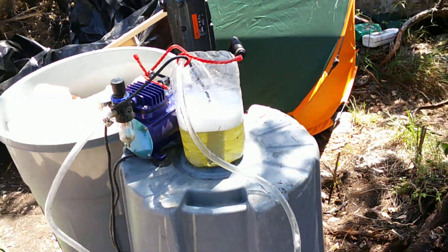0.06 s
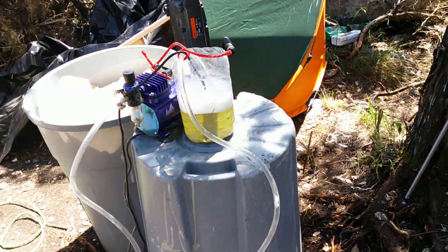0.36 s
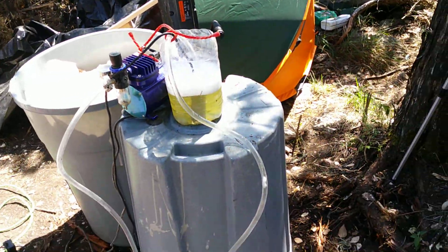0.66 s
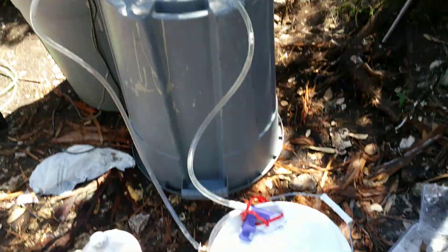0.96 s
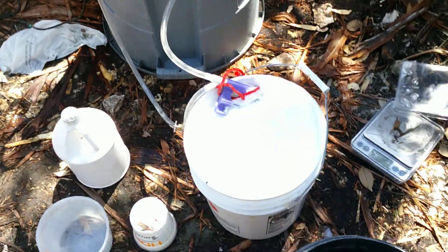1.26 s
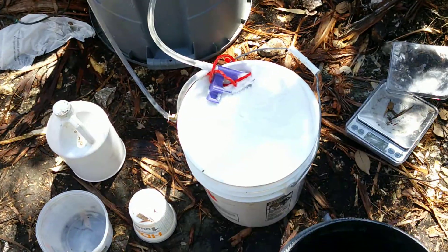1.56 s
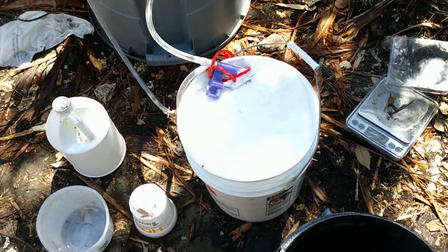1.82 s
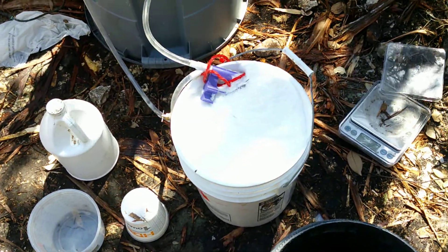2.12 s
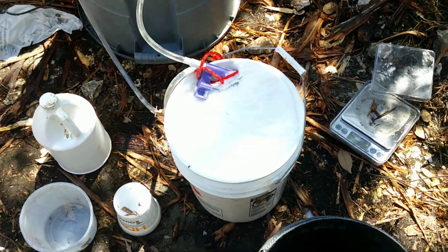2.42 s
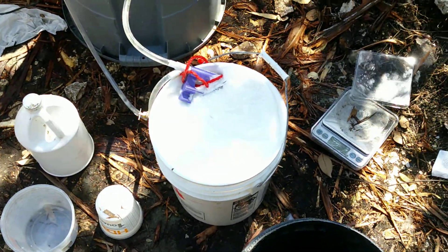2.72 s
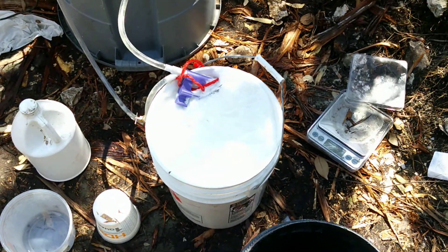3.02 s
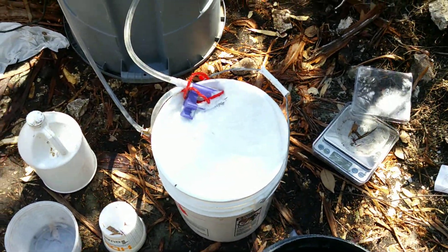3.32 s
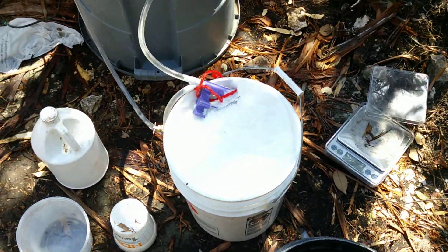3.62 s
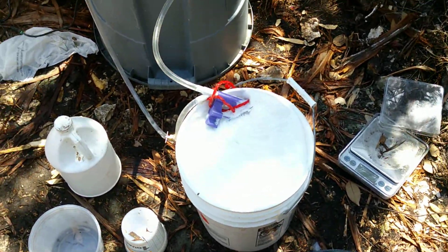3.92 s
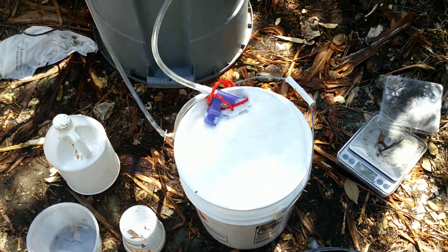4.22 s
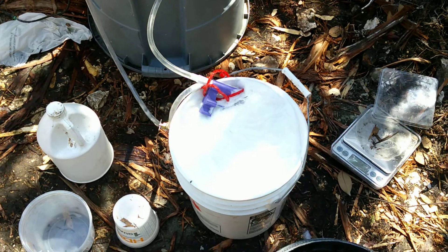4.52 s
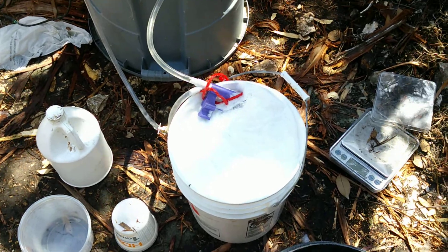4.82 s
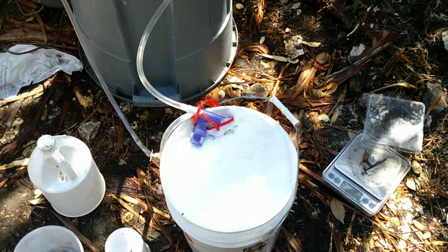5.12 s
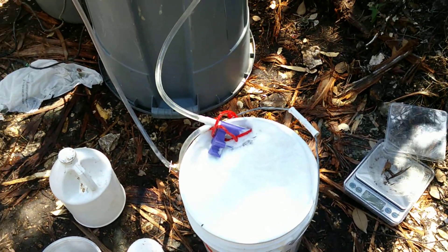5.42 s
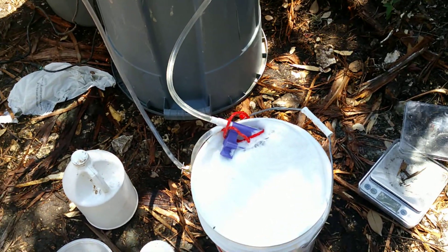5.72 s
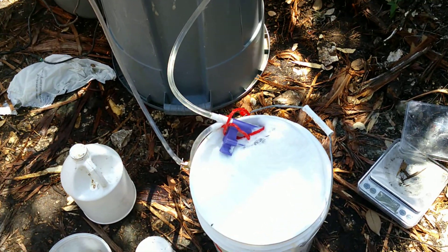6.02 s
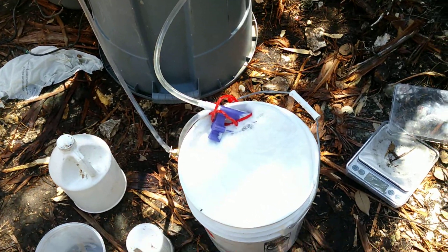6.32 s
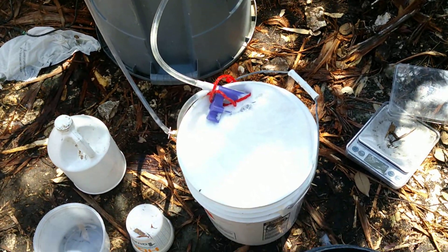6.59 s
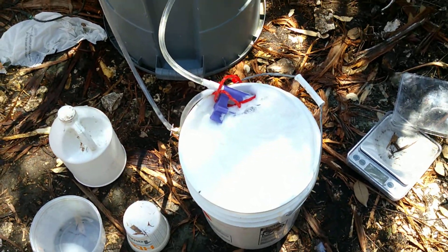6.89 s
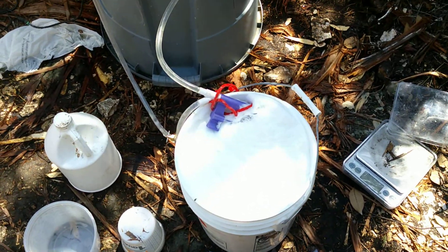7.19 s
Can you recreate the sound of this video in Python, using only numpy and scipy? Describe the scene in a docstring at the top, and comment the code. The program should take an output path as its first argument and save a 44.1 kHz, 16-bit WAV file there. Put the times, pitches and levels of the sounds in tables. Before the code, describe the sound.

Outdoors, a small engine, probably a generator, drones steadily with a rattling casing, while a small air pump hums, ticks and hisses over it. About a second in, something clicks close by and gusts thump on the hand-held microphone, as the hiss of air through a hose into foam grows a little. Lighter gusts follow. Near the end, dry litter crunches faintly and a stick knocks once.

```python
"""A small piston air pump runs outdoors: its motor hums and its valves tick and hiss once a turn.
Under it drones a small engine, probably a generator, with two puffs a cycle and a clattering casing.
About a second in, the hand-held microphone swings from the pump down to a bucket, where air hisses
through a hose into foam. Gusts buffet the microphone; close by, something clicks a few times and
a faint ring fades. Near the end, dry litter crunches underfoot and a stick knocks."""
import sys
import numpy as np
from scipy import signal
from scipy.fft import rfft, irfft, next_fast_len
from scipy.io import wavfile
from scipy.ndimage import map_coordinates

SR = 44100
rng = np.random.default_rng(int(sys.argv[2]) if len(sys.argv) > 2 else 0)


def wav_out(sig):
    """Save sig, one row per channel (or a flat mono array), as 16-bit PCM at SR to the path in sys.argv[1]."""
    wavfile.write(sys.argv[1], SR, np.round(np.clip(np.atleast_2d(sig).T, -1, 1) * 32767).astype(np.int16))


N = 324135

# the engine's firing rate, hunting slightly about its set speed: (t/s, f/Hz)
FIRING_RATE = [(0.0, 36.07), (0.54, 35.9), (1.85, 35.8), (2.08, 36.06), (3.66, 35.94), (4.22, 36.09),
               (4.74, 35.77), (6.83, 35.82), (7.35, 35.99)]


def pump(shaft_hz=28.495, reed_hz=6950, opens_at=0.67):
    """The motor hums and air hisses; once a turn the valve reed chirps and air surges into the hose."""
    # motor hum: (multiple of the shaft rate, level/dB)
    orders = [(3, -64.5), (4, -67), (6, -51), (8, -47), (9, -53.5), (11, -63.5), (12, -54), (16, -63.5),
              (17, -49.5), (18, -52), (19, -53.5), (21, -57), (22, -59)]
    # spectrum of air through the valves: (f/Hz, level/dB)
    valve_spectrum = [(3000, -33), (4600, -21), (5700, -12.5), (6300, -15), (6800, -1.5), (7100, 3),
                      (7400, 1), (8000, -11), (8600, -17), (9100, -41.5)]
    # spectrum of air forced through the hose into the foam: (f/Hz, level/dB)
    hose_spectrum = [(3500, -28), (4650, -20), (5080, -6.5), (5280, -9.5), (5500, -11), (5720, -9),
                     (6230, 0.5), (6420, -6), (6600, -6.5), (7100, -12), (8500, -40)]
    turns = shaft_hz * clock()
    hum = sum(amp(db + wobble(2.5)) * np.cos(2 * np.pi * (k * turns + rng.random())) for k, db in orders)
    air = coloured(noise(), valve_spectrum)
    flutter = np.sin(2 * np.pi * reed_hz * clock() + 2.5 * wobble(700))
    reed = unit(flutter * stroke(turns, opens_at, width=0.048) * per_cycle(turns, scatter_db=3.5))
    hose = coloured(noise() * (0.7 + stroke(turns, opens_at, width=0.12)), hose_spectrum)
    return (hum + amp(mic_swing(-60.5, -60)) * air
            + amp(mic_swing(-63.5, -65.5)) * reed
            + amp(mic_swing(-72, -64.5)) * hose)


def engine(intake_at=0.96, exhaust_at=0.255, jitter_cycles=0.0043, gas_db=-37.5, rasp_db=-49):
    """Firing tones, with gas noise, muffler rasp and casing clatter pulsing in step."""
    # spectrum of the exhaust's rough gas noise: (f/Hz, level/dB)
    gas_spectrum = [(25, -28), (45, -25), (70, -14.5), (110, -9.5), (200, -2.5), (300, -3), (380, -2),
                    (450, -5), (550, -7), (670, -7), (790, -9.5), (1200, -20), (3000, -72.5)]
    # the muffler's resonance, rasping at each exhaust puff: (f/Hz, level/dB)
    muffler_spectrum = [(300, -38.5), (550, -11), (670, -2), (780, -10), (1100, -23), (3000, -74)]
    rate_hz = np.interp(clock(), *np.transpose(FIRING_RATE))
    turns = np.cumsum(rate_hz) / SR + jitter_cycles * wobble(14)  # firings come a little early or late
    bark_db = mic_swing(1.5, -1.83)
    tones = firing_tones(turns, bark_db, intake_at, exhaust_at) * amp(0.95 * wobble(45))
    puff_at = exhaust_at - 0.02
    puffs = stroke(turns, puff_at, width=0.056) + 0.73 * stroke(turns, intake_at, width=0.061)
    gas = coloured(noise() * (1.5 + puffs * per_cycle(turns, scatter_db=3)), gas_spectrum)
    rasp = coloured(noise() * stroke(turns, puff_at, width=0.065), muffler_spectrum)
    return tones + amp(gas_db) * gas + amp(bark_db + rasp_db) * rasp + casing_clatter(turns)


def firing_tones(turns, bark_db, intake_at, exhaust_at, intake_top_hz=520, waver_db=1.27):
    """Harmonics phased as two puffs a cycle: the intake's dull suck, then the exhaust's brighter bark."""
    # engine drone: (multiple of the firing rate, level/dB)
    orders = [(2, -56), (3, -55.5), (4, -47), (5, -37.5), (6, -38), (7, -43), (8, -37.5), (9, -55.5),
              (10, -44.5), (11, -51.5), (12, -46), (13, -51), (14, -67), (15, -67.5), (16, -51),
              (17, -47.5), (18, -42.5), (19, -44.5), (20, -54.5), (21, -52), (25, -65), (26, -60),
              (27, -70), (28, -58), (31, -54.5), (32, -61), (40, -54), (44, -68)]
    out = np.zeros(N)
    for k, db in orders:
        hz = k * FIRING_RATE[0][1]
        suction = 1.25 / (1 + (hz / intake_top_hz) ** 10)
        puffs = np.exp(-2j * np.pi * k * exhaust_at) - suction * np.exp(-2j * np.pi * k * intake_at)
        phase = np.angle(puffs) + 0.18 * rng.standard_normal()  # echoes blur the puffs
        in_bark_band = 550 < hz < 800
        gain = amp(db + in_bark_band * bark_db + waver_db * wobble(3.253))
        drift = 0.33 * wobble(7)
        out += np.sqrt(2) * gain * np.sin(2 * np.pi * k * turns + phase + drift)
    return out


def casing_clatter(turns, knock_at=0.1, later_knock_at=0.73):
    """The engine's casing rattles throughout, with two sharp knocks each cycle."""
    # spectrum of the casing: (f/Hz, level/dB)
    spectrum = [(300, -34), (780, -11.5), (900, -1.5), (985, 1), (1100, -12.5), (1300, -12), (1600, -14.5),
                (2200, -18), (2700, -23.5), (3300, -31), (4500, -41), (9000, -76.5)]
    knocks = stroke(turns, knock_at, width=0.031) + 1.1 * stroke(turns, later_knock_at, width=0.014)
    rattle = noise() * (2 + 0.6 * knocks * per_cycle(2 * turns, scatter_db=4.5))
    return amp(mic_swing(-40.6, -41)) * coloured(rattle, spectrum)


def wind(eddy_width_cycles=0.47, strong_db=-32, low_cut_hz=80):
    """Lumpy turbulence at the microphone port, brighter as it blows harder; eddies thump on it."""
    # soft rumble of light air: (f/Hz, level/dB)
    rumble = [(25, -23.5), (50, -14.5), (90, 6.5), (140, 10.5), (230, 0), (330, -17), (500, -28.5),
              (1000, -58)]
    # brighter flutter of strong gusts: (f/Hz, level/dB)
    buffet = [(25, -42.5), (60, -26.5), (110, -14), (170, 3), (250, -2), (370, -4.5), (470, -9), (600, -23),
              (1000, -39), (3000, -55.5), (9000, -86)]
    # single eddies, each a brief swing of pressure: (t/s, level/dB, f/Hz)
    eddies = [(1.185, -10, 343), (1.23, -17, 240), (1.271, -11.5, 209), (1.313, -13, 258),
              (1.723, -2.2, 239), (1.757, -9.5, 199), (1.81, -11.5, 305), (1.828, -12.5, 184),
              (1.847, -7.5, 191), (1.927, -12.5, 265), (1.955, -15.5, 176), (5.193, -18, 151.5)]
    force = wind_force()
    bright = force ** 2 / (force ** 2 + amp(strong_db) ** 2)
    flow = np.sqrt(1 - bright) * coloured(noise(), rumble) + np.sqrt(bright) * coloured(noise(), buffet)
    out = force * unit(flow * amp(2.9 * wobble(70)))
    for at, db, hz in eddies:
        cycles = (clock() - at) * hz
        out -= amp(db) * np.cos(2 * np.pi * cycles) * bell(cycles / eddy_width_cycles)
    return filtered(out, lambda hz: hz ** 2 / np.hypot(hz ** 2, low_cut_hz ** 2))


def wind_force(calm_db=-52.5, rise_s=0.012, fall_s=0.014):
    """Gusts swell, hold and fade, the longer ones more slowly; their powers add to the light air's."""
    # gusts on the microphone: (start t/s, hold/s, level/dB)
    gusts = [(1.12, .08, -23), (1.24, .19, -19), (1.5, 0.037, -25), (1.71, 0.055, -21.5),
             (1.82, 0.025, -20.5), (1.92, .04, -29), (2.42, 0.031, -33.5), (2.6, .1, -33),
             (2.81, 0.033, -31.5), (3.379, 0.26, -37.5), (5.169, 0.036, -28), (5.28, 0.069, -32.5),
             (5.52, .22, -37)]
    t, power = clock(), amp(calm_db) ** 2
    for start, hold, db in gusts:
        early = np.maximum(start - t, 0) / (rise_s + 0.34 * hold)
        late = np.maximum(t - start - hold, 0) / (fall_s + 0.08 * hold)
        power = power + (amp(db) * np.exp(-early - late)) ** 2
    return np.sqrt(power)


def clicks():
    """Something small and hard clicks near the microphone."""
    # sharp blows: (t/s, level/dB)
    blows = [(1.0444, -31.5), (1.0524, -36.5), (1.058, -46), (5.742, -45)]
    # the modes they ring: (f/Hz, level/dB, t60/s)
    modes = [(2120, -2, 0.019), (2780, -3, 0.0087), (3270, -2.5, .012), (3590, -5.5, 0.026),
             (4200, -10.5, .016), (5300, -5, 0.0047), (6500, -7, 0.0042)]
    return struck(blows, modes)


def stick():
    """A dry stick knocks once underfoot."""
    # the blow: (t/s, level/dB)
    blows = [(7.1643, -22)]
    # the stick's modes: (f/Hz, level/dB, t60/s)
    modes = [(480, 1, 0.02), (790, -4, 0.02), (1020, 2, 0.021), (1520, -1, 0.016), (2080, -8, 0.022),
             (2700, -18, 0.02)]
    return struck(blows, modes)


def faint_ring_and_litter():
    """A faint, narrow ring near 3.9 kHz fades slowly; later, dry litter crunches in short bursts."""
    # noise bands, the ring first: (peak t/s, level/dB, rise/s, fall/s, centre f/Hz, width/octaves)
    bands = [(1.55, -64, .08, 0.43, 3860, 0.18), (6.75, -53.5, 0.091, 0.072, 7046, 0.12),
             (6.75, -60, 0.074, 0.056, 4000, 0.68), (7.17, -40.5, 0.0018, 0.0056, 7100, 0.14),
             (7.171, -40, 0.0031, 0.0031, 2700, 0.57)]
    out = np.zeros(N)
    for at, db, rise, fall, centre_hz, octaves in bands:
        grains = noise() * amp(1.7 * wobble(300))
        band = unit(filtered(grains, lambda hz: bell(np.log2((hz + 1) / centre_hz) / octaves)))
        age = clock() - at
        out += amp(db) * band * np.exp(-np.maximum(-age / rise, age / fall))
    return out


def struck(blows, modes):
    """Each sharp blow sets off the short ring of a small hard thing."""
    impulses = np.zeros(N)
    for at, db in blows:
        impulses[round(at * SR)] = amp(db)
    t = clock()[:SR // 10]
    ring = sum((-1) ** k * amp(db - 60 * t / t60) * np.sin(2 * np.pi * hz * t)
               for k, (hz, db, t60) in enumerate(modes))
    return signal.fftconvolve(impulses, ring)[:N]


def mic_swing(pump_db, bucket_db, start_s=0.75, end_s=1.25):
    """A layer's gain in dB as the microphone swings from the pump down to the bucket."""
    return np.interp(clock(), [start_s, end_s], [pump_db, bucket_db])


def stroke(turns, at, width):
    """A bump once a cycle; place and width are shares of the cycle."""
    return bell(((turns - at + 0.5) % 1 - 0.5) / width)


def per_cycle(turns, scatter_db):
    """A new random gain for each cycle."""
    return amp(scatter_db * rng.standard_normal(N // 100))[turns.astype(int)]


def wobble(rate):
    """A smooth random curve, rate knots a second."""
    knots = rng.standard_normal(int(N * rate / SR) + 4)
    coarse = np.arange(0, N + 64, 64)
    return np.interp(np.arange(N), coarse, map_coordinates(knots, [coarse * rate / SR]))


def coloured(x, spectrum):
    """x shaped by (f/Hz, level/dB) points on a log axis, at rms 1."""
    f, db = np.transpose(spectrum)
    return unit(filtered(x, lambda hz: amp(np.interp(np.log(hz + 1), np.log(f), db))))


def filtered(x, response):
    """x through a frequency response."""
    size = next_fast_len(N + SR // 2)
    return irfft(rfft(x, size) * response(np.fft.rfftfreq(size, 1 / SR)), size)[:N]


def bell(x):
    """A Gaussian of height 1."""
    return np.exp(-0.5 * x ** 2)


def noise():
    """White noise."""
    return rng.standard_normal(N)


def amp(db):
    """Decibels to gain."""
    return 10 ** (np.asarray(db) / 20)


def unit(x):
    """x at rms 1."""
    return x / np.sqrt(np.mean(x ** 2) + 1e-20)


def clock():
    """The time of each sample in seconds."""
    return np.arange(N) / SR


def scene():
    """Both machines in the open air, with wind and small noises close by, in mono."""
    close_by = clicks() + stick() + faint_ring_and_litter()
    return (engine() + pump() + wind() + close_by)[None]


def record(dry):
    """The hardest eddy overloads the microphone, and the treble ends at a steep band limit."""
    overload, top_hz = 0.69, 9000
    clipped = np.clip(dry[0], -overload, overload)
    return filtered(clipped, lambda hz: 1 / np.sqrt(1 + (hz / top_hz) ** 120))[None]


dry = scene()
out = record(dry)
wav_out(out)
```